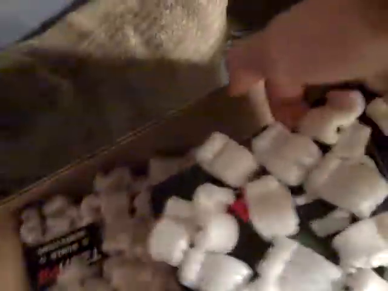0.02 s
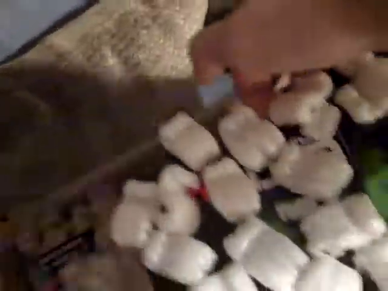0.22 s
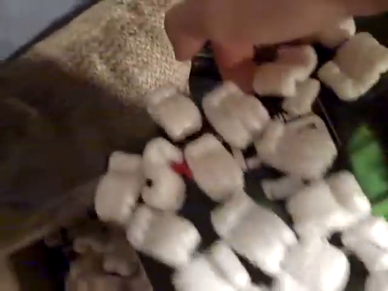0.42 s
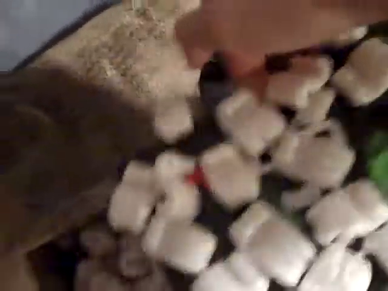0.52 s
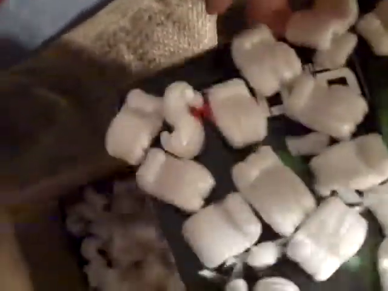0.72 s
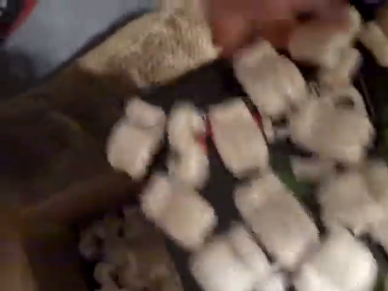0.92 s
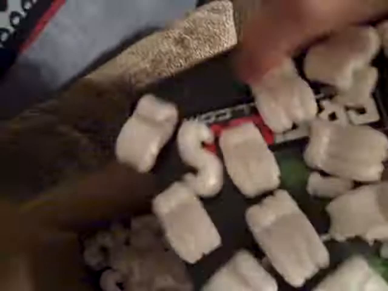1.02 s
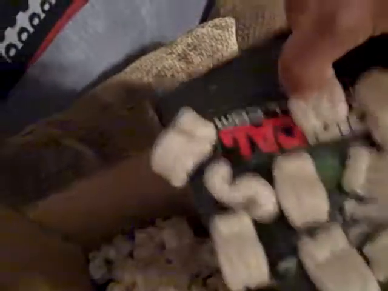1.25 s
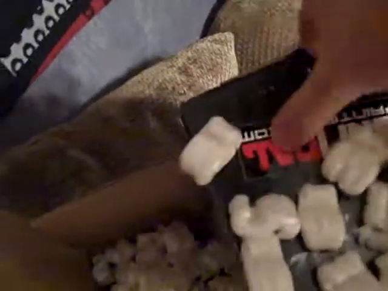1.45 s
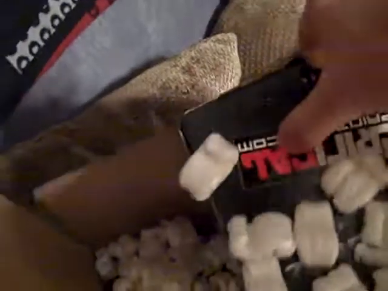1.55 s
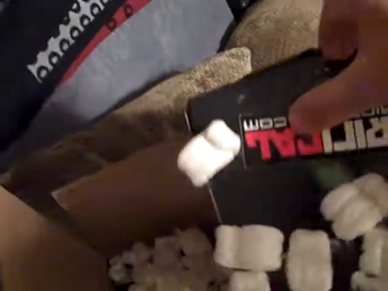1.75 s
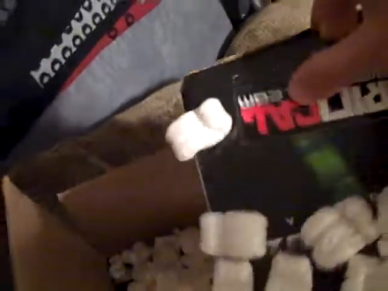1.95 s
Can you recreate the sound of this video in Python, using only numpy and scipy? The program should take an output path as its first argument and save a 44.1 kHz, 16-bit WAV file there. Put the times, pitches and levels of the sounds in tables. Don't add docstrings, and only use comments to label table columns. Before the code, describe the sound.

Close, slightly dull small-camera pickup of a hand rummaging in foam peanuts: light taps, a sudden hollow box thump with dense crackling, brief sticking squeaks, sharp ticks, a late knock, then quieter rustling in a small room.

```python
import sys
import numpy as np
from scipy import signal
from scipy.fft import rfft, irfft, next_fast_len
from scipy.io import wavfile
from scipy.ndimage import uniform_filter1d, map_coordinates

SR = 44100
rng = np.random.default_rng(int(sys.argv[2]) if len(sys.argv) > 2 else 0)


def output_pcm(signal):
    pcm = np.clip(np.atleast_2d(signal).T, -1, 1) * 32767
    wavfile.write(sys.argv[1], SR, np.round(pcm).astype(np.int16))


def nominal_scale(level):
    x = np.asarray(level, float) / 20
    return 10 ** x


N = 88200
SLIPS_PER_S, SLIP_SPREAD_DB = 2500, 3.5
THUDS_PER_S = 300


def unit(x):
    return x / np.sqrt(np.mean(x ** 2) + 1e-20)


def along(points, hz):
    point_hz, value = np.transpose(points)
    return np.interp(np.log(hz + 1), np.log(point_hz + 1), value)


def curve(rows):
    s, value = np.transpose(rows)
    return np.interp(np.arange(N) / SR, s, value)


def wobble(knots_per_s):
    knots = rng.standard_normal(int(N * knots_per_s / SR) + 4)
    return map_coordinates(knots, [np.arange(N) * knots_per_s / SR])


def swell(start_s, length_s, rise_s, t60_s):
    t = np.arange(N) / SR - start_s
    return np.clip(t / rise_s, 0, 1) * nominal_scale(-60 * np.maximum(t - length_s, 0) / t60_s)


def causal(points, size=4096):
    cepstrum = irfft(np.log(nominal_scale(along(points, np.fft.rfftfreq(size, 1 / SR))) + 1e-6))
    cepstrum[1:size // 2] *= 2
    cepstrum[size // 2 + 1:] = 0
    return irfft(np.exp(rfft(cepstrum)))[:size // 2]


def patchy(pair):
    # frequency in Hz, patch depth in dB.
    patch_depth = [(200, 2), (1200, 5), (4000, 3), (8000, 2.5), (10500, 7)]
    hz, _, z = signal.stft(pair, SR, nperseg=512)
    field = rng.standard_normal(z.shape[1:])
    field = uniform_filter1d(field, size=4, axis=0)
    field = unit(uniform_filter1d(field, size=6, axis=1))
    gain = nominal_scale(along(patch_depth, hz)[:, None] * field)
    return signal.istft(z * gain, SR, nperseg=512)[1][:, :N]


def grains(per_s, spread_db, colour):
    hiss_db, biggest = 8, 3
    when, sign, rarity = rng.random((round(per_s * N / SR), 3)).T
    size = nominal_scale(spread_db * np.minimum(-np.log(1 - rarity), biggest))
    ticks = np.bincount((when * N).astype(int), np.sign(sign - .5) * size, N)
    smear = rng.standard_normal(64) * np.hanning(64)
    pair = np.array([unit(ticks), unit(np.convolve(ticks, smear)[:N])])
    pair = pair + nominal_scale(hiss_db) * rng.standard_normal((2, N))
    pair = patchy(signal.fftconvolve(pair, causal(colour)[None], axes=1)[:, :N])
    return pair / pair.std(axis=1, keepdims=True)


def spread(middle, side, lefter=None):
    # frequency in Hz, left-right likeness (0-1).
    likeness = [(60, 0.41), (170, 0.91), (480, 0.86), (1370, 0.71), (3880, 0.57), (11000, 0.43)]
    # frequency in Hz, left over right in dB.
    usual_lefter = [(60, -3), (200, -1), (2000, 0), (5500, -2), (6300, -2), (6800, 6), (7600, 11),
                    (9000, 14)]
    if lefter is None:
        lefter = usual_lefter
    size = next_fast_len(N + 8192)
    hz = np.fft.rfftfreq(size, 1 / SR)
    angle = np.arccos(np.clip(along(likeness, hz), -1, 1)) / 2
    a = rfft(middle, size) * np.cos(angle)
    b = rfft(side, size) * np.sin(angle)
    tilt = nominal_scale(along(lefter, hz) / 2)
    return irfft([(a + b) * tilt, (a - b) / tilt], size)[:, :N]


def crackle():
    # time in seconds, stirring strength in dB, scuffing relative to it in dB.
    stir_rows = [(0, -37.5, 4.5), (.24, -40, 6), (.33, -32, 3.5), (.4, -27.5, 3), (.48, -23.5, 0),
                 (.57, -24.5, -3), (.6, -30, 3), (.67, -29, 0.5), (.7, -33.5, 3), (0.819, -28, -3.5),
                 (.98, -33.5, 1), (1.12, -34.5, 3.5), (1.3, -32, -1.5), (1.44, -35.5, -1.5),
                 (1.68, -40, -1), (1.72, -37, -0.5), (1.82, -37.5, -4.5), (2, -43, -1.5)]
    # frequency in Hz, crackle colour in dB per Hz.
    foam_colour = [(2000, -58.5), (3200, -21.5), (4300, -10), (5350, -4.5), (5950, -2), (7340, -3),
                   (9720, -24), (11400, -38), (14900, -114), (22000, -120)]
    # frequency in Hz, scuff colour in dB per Hz.
    scuff_colour = [(300, -48), (600, -1.5), (1500, -6), (2100, -0.5), (3400, 0.5), (4600, -3), (7000, -43),
                    (22000, -120)]
    clump_db, scuff_db, scuff_clump_db = 1, -7.5, 2.5
    s, strength_db, scuff_over_db = np.transpose(stir_rows)
    strength = curve(np.c_[s, strength_db])
    rub_gain = nominal_scale(strength + clump_db * wobble(60.01) + 0.94 * wobble(220) + 0.17 * wobble(10))
    scuff_gain = nominal_scale(strength + curve(np.c_[s, scuff_over_db]) + scuff_db + scuff_clump_db * wobble(45.06))
    rub = rub_gain * grains(SLIPS_PER_S, SLIP_SPREAD_DB, foam_colour)
    scuff = scuff_gain * grains(SLIPS_PER_S / 2, SLIP_SPREAD_DB, scuff_colour)
    return spread(*(rub + scuff))


def crunches():
    # start in seconds, length in seconds, level in dB.
    crunch_rows = [(0.047, 0.03, -35.5), (0.182, 0.028, -33), (0.225, 0.032, -35), (0.351, 0.035, -19.5),
                   (0.464, 0.025, -24.5), (0.547, 0.012, -31), (0.845, 0.01, -50), (0.93, 0.04, -34),
                   (1.047, 0.052, -29.5), (1.154, 0.027, -37), (1.268, 0.014, -30.5), (1.37, 0.012, -32),
                   (1.422, 0.015, -42), (1.478, 0.0065, -38.5), (1.69, 0.0061, -29.5),
                   (1.801, 0.022, -39.5)]
    # frequency in Hz, crunch colour in dB per Hz.
    crush_colour = [(290, -38), (600, -2), (1500, -11), (2800, -7), (7400, -0.5), (11000, -32.5),
                    (11600, -67.5), (22000, -120)]
    rise_share, t60_s = 0.35, 0.071
    gain = sum(nominal_scale(db) * swell(s, length_s, rise_share * length_s, t60_s) for s, length_s, db in crunch_rows)
    return spread(*(gain * grains(SLIPS_PER_S, SLIP_SPREAD_DB, crush_colour)))


def slips():
    # slip time in seconds, peak in dB.
    creak_rows = [(1.0514, -1), (1.0605, -1.5), (1.0681, -5), (1.0719, -11), (1.0741, -6), (1.0785, -7),
                  (1.0827, -10), (1.0865, -12), (1.0903, -9), (1.0948, -16), (1.0978, -18), (1.1008, -19),
                  (1.104, -18), (1.2295, -2), (1.233, -4), (1.2356, -8), (1.2373, -8), (1.2385, -7),
                  (1.24, -8), (1.2407, -8)]
    # snap time in seconds, peak in dB.
    snap_rows = [(.368, -10), (.3775, -13), (.5747, -16), (.7437, -19), (.8195, -17), (.883, -18),
                 (1.1323, -17), (1.1600, -9), (1.3213, -21), (1.3783, -21), (1.3841, -20), (1.3902, -22),
                 (1.3939, -23), (1.4007, -19), (1.416, -21), (1.427, -22), (1.4376, -21), (1.4765, -24),
                 (1.6197, -21), (1.6896, -21), (1.694, -20), (1.8213, -24)]
    # frequency in Hz, slip colour in dB per Hz.
    slip_colour = [(200, -51.5), (600, -22), (2000, -20.5), (3100, -11.5), (4300, -16.5), (5500, -2.5),
                   (7200, 3.5), (8400, -10), (11000, -26), (13000, -63)]
    # frequency in Hz, left over right in dB.
    slip_lefter = [(60, 0), (4200, 0), (5500, -6), (6200, -4), (6900, 7), (7600, 12), (8400, 8), (10000, 6)]
    ring_db, ring_t60_s = -13, .006
    out = np.zeros((2, N + SR))
    t = np.arange(SR // 50) / SR
    body = causal(slip_colour)
    for s, db in [*creak_rows, *snap_rows]:
        kick = nominal_scale(ring_db - 60 * t / ring_t60_s) * rng.standard_normal((2, len(t)))
        kick[0, 0] = 1
        pair = signal.fftconvolve(kick, body[None], axes=1)
        pair = pair / np.abs(pair).max(axis=1, keepdims=True)
        out[:, round(s * SR):][:, :pair.shape[1]] += nominal_scale(db) * pair
    return spread(*out[:, :N], slip_lefter)


def knocks():
    # time in seconds, peak in dB, lowest mode in Hz, hardness in dB, ring length share.
    knock_rows = [(0.056, -36.5, 270, -9, .7), (0.339, -25, 334, 12, 0.97), (0.3908, -6.5, 237, 3.5, 0.92),
                  (0.3973, -12, 214, 2, 0.21), (0.409, -12.5, 232, -2, 0.96), (.43, -18.5, 303, -8, 0.77),
                  (0.442, -17.5, 230, -12, 0.84), (0.457, -20.5, 220, 13, .7), (.477, -10, 263, 6, 0.69),
                  (.486, -20, 237, 2, 0.91), (0.505, -21, 205, -8, .9), (.527, -18, 221, 2, 0.59),
                  (.553, -20, 216, -5, 0.63), (.582, -22, 218, -13, 0.76), (1.0172, -16.5, 290, 2, 0.5),
                  (1.041, -24, 290, 2, 0.78), (1.119, -20.5, 258, -8, 0.24), (1.2874, -17, 288, 1, 0.37),
                  (1.472, -27.5, 302, 15, 0.27), (1.7193, -7.5, 333, 0, 0.23), (1.7284, -20.5, 266, 5, 0.5),
                  (1.7356, -20.5, 210, 11, 0.31), (1.745, -24.5, 225, 8, 0.72)]
    # ratio to lowest mode, level in dB, t60 in seconds.
    box_modes = [(1, 0, .075), (1.45, -9, .03), (2.6, -11, .025), (3.2, -12, .02), (4.6, -17, .012),
                 (6.2, -17, .01), (9.2, -26, .008)]
    # frequency in Hz, rattle colour in dB per Hz.
    rattle_colour = [(60, -40), (110, -8), (240, 0), (450, -9), (900, -14), (1700, -19), (2600, -32),
                     (8000, -100)]
    gain_db, blow_s, detune = -1.5, .0013, .03
    rattle_db, rattle_t60_s = -13, .11
    out = np.zeros(N + SR)
    shake = np.zeros(N)
    t = np.arange(SR // 4) / SR
    for s, db, hz, hard_db, share in knock_rows:
        ring = np.zeros(len(t))
        for ratio, level_db, t60_s in box_modes:
            level_off_db, pitch_off = rng.standard_normal(2)
            mode_db = level_db + hard_db * np.log(ratio) + level_off_db
            mode_hz = hz * ratio * (1 + detune * pitch_off)
            ring += nominal_scale(mode_db - 60 * t / t60_s / share) * np.sin(2 * np.pi * mode_hz * t)
        out[round(s * SR):][:len(t)] += nominal_scale(db + gain_db) * ring * (1 - np.exp(-t / blow_s))
        shake += nominal_scale(db + rattle_db) * swell(s, 0.0042, 0.00036, rattle_t60_s * share)
    panels = out[:N] * nominal_scale([[-.6], [.6]])
    return panels + spread(*(shake * grains(6 * THUDS_PER_S, 1.2, rattle_colour)))


def taps():
    # time in seconds, peak in dB, pitch in Hz.
    tap_rows = [(.0612, -22, 704), (.196, -26, 910), (.263, -26, 820), (.323, -26.5, 630), (.361, -28, 710),
                (.402, -22, 1070), (.459, -14.5, 704), (.480, -15, 750), (.6023, -44, 1100),
                (.747, -27, 610), (.939, -25, 810), (1.016, -24, 1640), (1.066, -24.5, 796),
                (1.085, -22.5, 751), (1.159, -16.5, 2450), (1.189, -31, 845), (1.229, -28, 1480),
                (1.276, -38, 2160), (1.288, -29.5, 820), (1.3845, -19, 2160), (1.464, -30, 995),
                (1.4765, -20, 1340), (1.549, -34, 2920), (1.6905, -19.5, 2100), (1.695, -28, 615),
                (1.7177, -14.5, 1240), (1.7198, -18, 2130), (1.725, -18.5, 1650), (1.7295, -21, 1400),
                (1.746, -24, 895), (1.8153, -38, 1800)]
    t60_cycles, upper_ratio, upper_db = 9.8, 1.64, -9.5
    out = np.zeros((2, N + SR))
    t = np.arange(SR // 20) / SR
    for s, db, hz in tap_rows:
        phase = 2 * np.pi * rng.random((2, 2, 1)) * [[[0]], [[1]]]
        ring = np.sin(2 * np.pi * hz * t + phase[:, 0])
        ring = ring + nominal_scale(upper_db) * np.sin(2 * np.pi * hz * upper_ratio * t + phase[:, 1])
        envelope = nominal_scale(db - 60 * t * hz / t60_cycles) * np.minimum(t * hz * 2, 1)
        out[:, round(s * SR):][:, :len(t)] += envelope * ring
    return spread(*out[:, :N])


def rumble():
    # time in seconds, weight shifting on the box in dB.
    load_rows = [(0, -42), (.27, -38), (.4, -32.5), (.56, -33.5), (.66, -40), (.76, -40.5), (.86, -48.5),
                 (.97, -44), (1.05, -43), (1.19, -44), (1.25, -44.5), (1.33, -44.5), (1.42, -46.5),
                 (1.5, -46), (1.66, -53), (1.76, -43.5), (1.88, -47), (2, -51.5)]
    # frequency in Hz, cardboard colour in dB per Hz.
    board_colour = [(60, -79), (110, -21.5), (220, 0.5), (330, -3.5), (700, -9.5), (1300, -20),
                    (2500, -13.5), (4000, -63.5)]
    gain = nominal_scale(curve(load_rows) + 3.22 * wobble(24.8))
    return spread(*(gain * grains(THUDS_PER_S, -2, board_colour)))


def pushes():
    # time in seconds, level in dB.
    push_rows = [(.01, -54), (.11, -56), (.29, -46), (.335, -35), (0.408, -30), (.6, -48), (0.649, -47),
                 (.7, -50), (1.05, -60), (1.135, -57), (1.22, -54), (1.298, -49), (1.47, -55), (1.61, -47),
                 (1.736, -46), (1.79, -46.5)]
    push_hz, push_s, pitch_spread_db, balance_spread_db = 83, 0.014, 2.7, 5.6
    out = np.zeros((2, N))
    for s, db in push_rows:
        t = np.arange(N) / SR - s
        pitch, phase, balance = rng.standard_normal(3)
        gain = nominal_scale(db + balance_spread_db * np.array([[balance - 1], [1 - balance]]) / 2)
        hz = push_hz * nominal_scale(pitch_spread_db * pitch)
        out += gain * np.exp(-(t / push_s) ** 2) * np.sin(2 * np.pi * hz * t + 3 * phase)
    return out


def walls(x):
    # frequency in Hz, t60 in seconds.
    wall_t60 = [(200, 0.2), (2000, 0.1), (10000, 0.18)]
    hz, t, z = signal.stft(rng.standard_normal((2, SR // 4)), SR, nperseg=256)
    tail = signal.istft(z * nominal_scale(-60 * t / along(wall_t60, hz)[:, None]), SR, nperseg=256)[1]
    return signal.fftconvolve(x, tail / np.linalg.norm(tail[0]), axes=1)[:, :N]


def scene():
    wall_db = -11
    hits = slips() + knocks() + taps()
    return crackle() + crunches() + hits + rumble() + pushes() + nominal_scale(wall_db) * walls(hits)


def drop_weak_bands(x):
    # frequency in Hz, drop threshold in dB relative to the moment's loudness.
    mask_rows = [(500, -42.5), (900, -34), (1500, -34.5), (2500, -35.5), (4500, -46), (7500, -57),
                 (8600, -37.5), (9600, -34.5), (11500, -31)]
    hold, floor_db = 0.37, -44
    hz, _, z = signal.stft(x, SR, nperseg=1024)
    power = np.abs(z) ** 2
    total = power.sum(axis=1).mean(axis=0)
    loud = signal.lfilter([0, 1 - hold], [1, -hold], total) + nominal_scale(floor_db) ** 2
    weak = uniform_filter1d(power, size=3, axis=1) < loud * nominal_scale(along(mask_rows, hz))[:, None] ** 2
    return x - signal.istft(z * weak, SR, nperseg=1024)[1][:, :N]


def low_pass(x):
    return signal.sosfilt(signal.butter(12, 11600, fs=SR, output="sos"), x)


def record(dry):
    low_cut_hz, clip_level = 63, 1.5
    low_cut = signal.butter(2, low_cut_hz, "high", fs=SR, output="sos")
    x = signal.sosfilt(low_cut, dry)
    x = x / (1 + np.abs(x / clip_level) ** 4) ** .25
    mix = drop_weak_bands(x)
    return low_pass(mix)


dry = scene()
out = record(dry)
output_pcm(out)
```